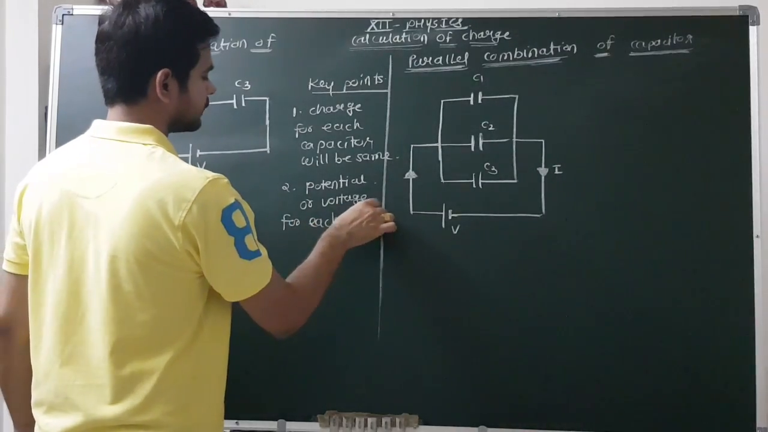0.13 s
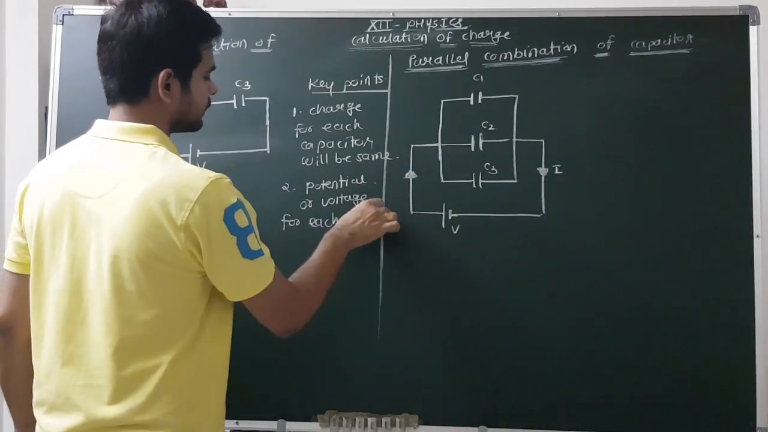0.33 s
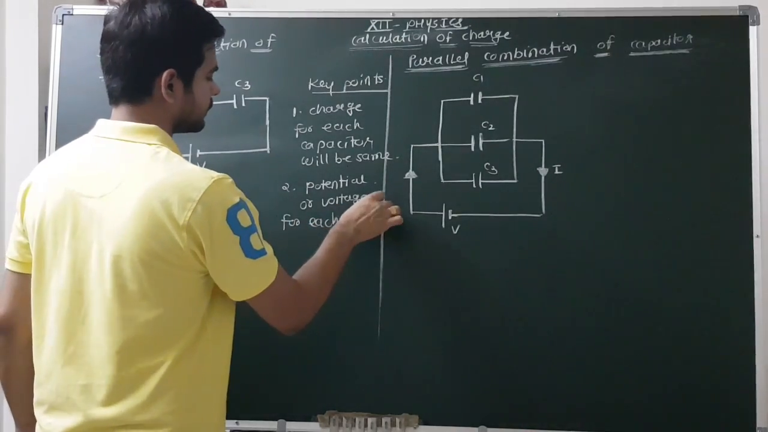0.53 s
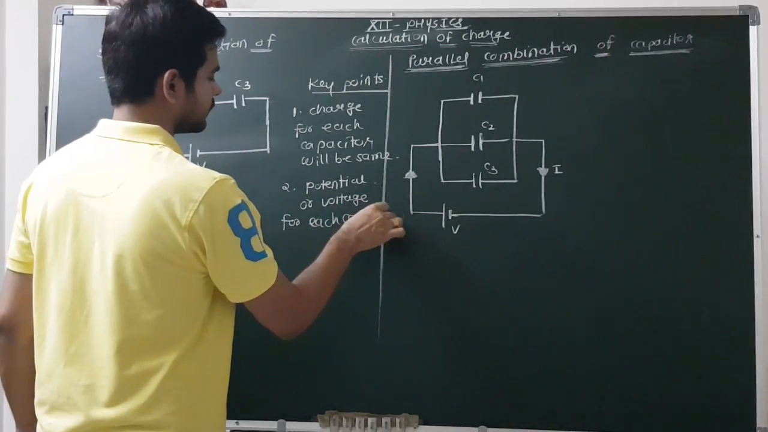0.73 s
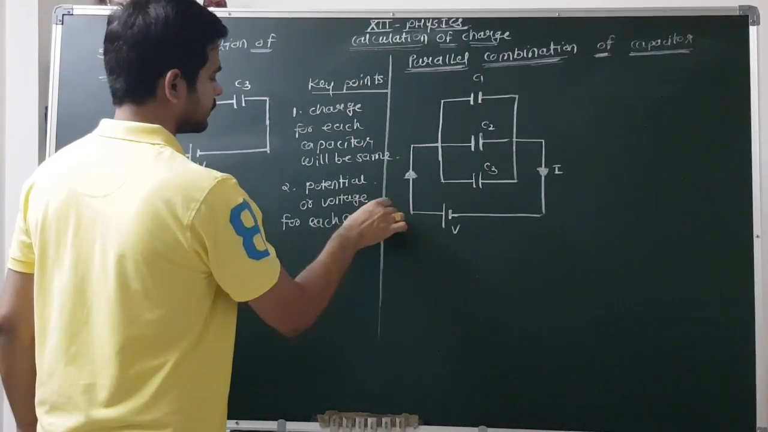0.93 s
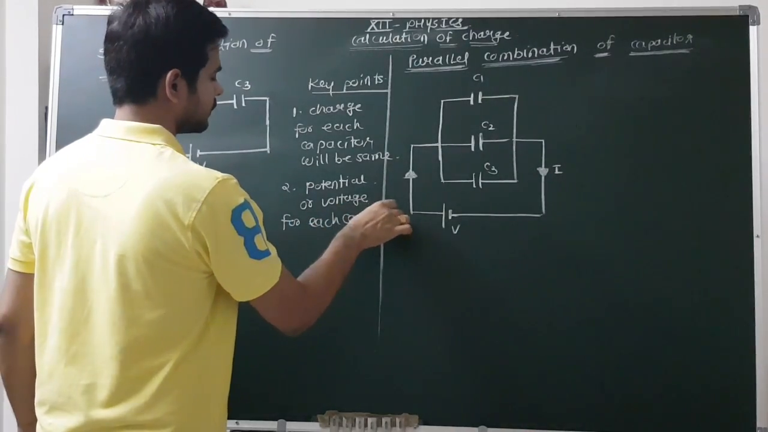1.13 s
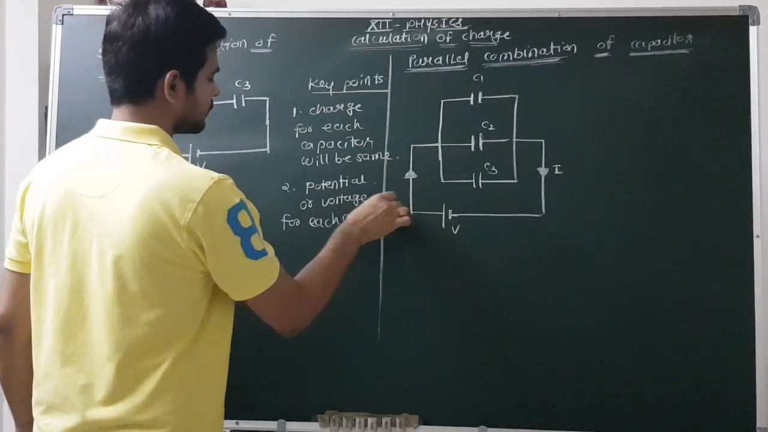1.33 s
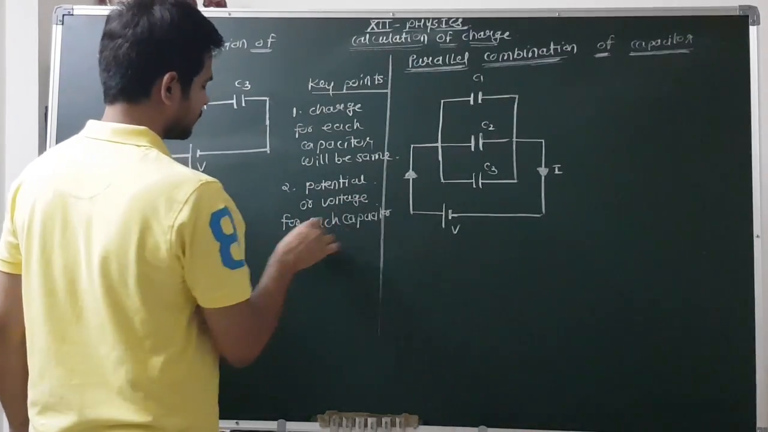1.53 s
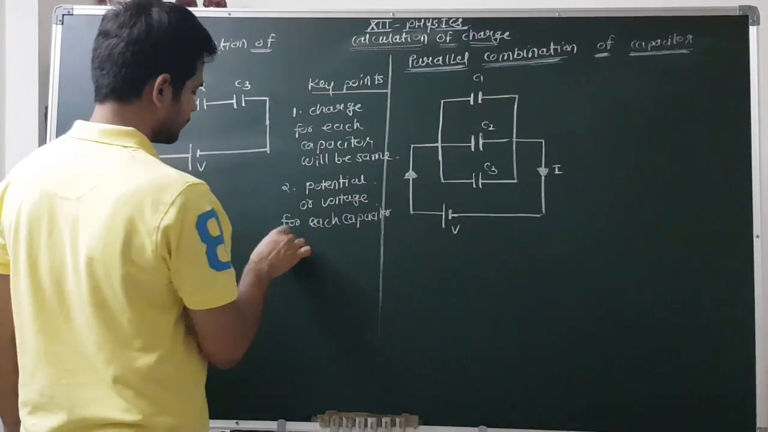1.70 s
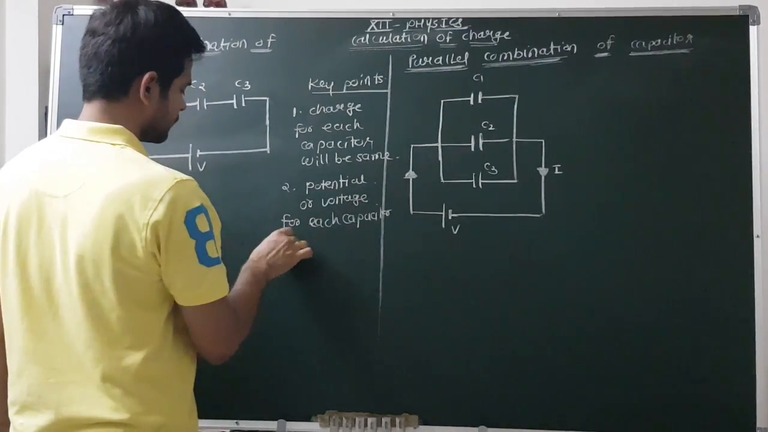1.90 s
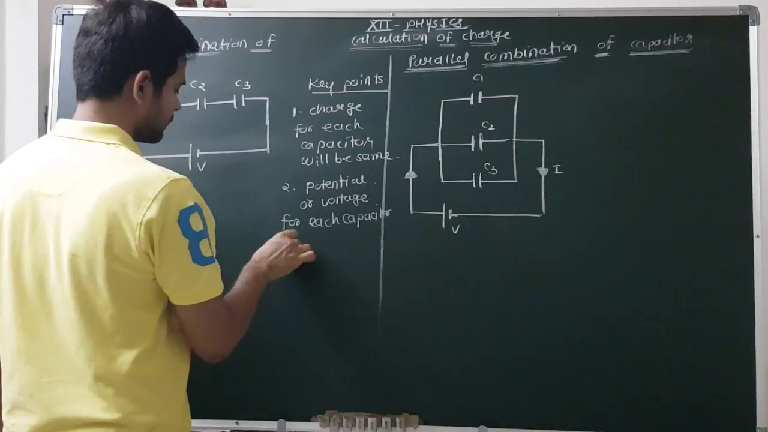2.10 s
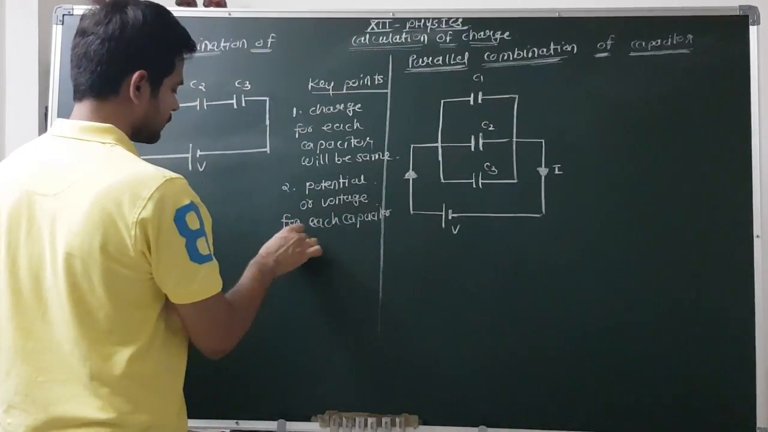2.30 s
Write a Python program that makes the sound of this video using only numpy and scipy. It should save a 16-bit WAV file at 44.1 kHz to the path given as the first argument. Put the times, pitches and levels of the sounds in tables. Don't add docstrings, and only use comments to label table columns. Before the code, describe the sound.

Chalk scratches a wall-hung blackboard in quick short strokes, with soft knocks as it lands; after a half-second pause of low room hum it taps and writes again, in a bare, slightly echoing room.

```python
import sys
import numpy as np
from scipy import signal
from scipy.fft import rfft, irfft
from scipy.io import wavfile
from scipy.ndimage import uniform_filter1d

SR = 44100
rng = np.random.default_rng(int(sys.argv[2]) if len(sys.argv) > 2 else 0)


def unload_audio(sound):
    columns = np.transpose(np.atleast_2d(sound))
    steps = np.round(np.clip(columns, -1, 1) * 32767)
    wavfile.write(sys.argv[1], SR, steps.astype(np.int16))


def gain_from_db(level_db):
    decades = np.asarray(level_db, float) / 20
    return 10 ** decades


N = 103767

# start in seconds, length in seconds, stick hiss in dB,
# lower stick modes over hiss in dB, board scrape in dB.
STROKES = [(-.03, .12, -45, -4.5, -49.5), (0.14, 0.23, -47, -4, -51.5), (0.396, 0.091, -41, -3, -47.5),
           (0.611, 0.047, -51, -0.5, -60), (0.647, 0.2, -47, -2.5, -52.5), (0.84, 0.14, -48.5, -3, -52.5),
           (0.956, 0.12, -50, -0.5, -56), (1.04, 0.15, -47.5, -2.5, -47), (1.152, 0.11, -47, -1, -50.5),
           (1.233, 0.15, -51, 0, -52.5), (1.293, 0.095, -44.5, -2, -44), (1.885, 0.074, -41, -4, -51),
           (1.913, 0.18, -44.5, -7.5, -46.5), (2.072, 0.1, -46, -7, -53.5), (2.115, 0.18, -49, -6.5, -52),
           (2.198, 0.12, -46.5, -5, -46.5), (2.264, 0.087, -71, 6, -52)]
# frequency in Hz, width in Hz, level in dB.
STICK_LOW_MODES = [(4995, 720, -0.5), (5460, 170, 3), (5765, 250, 2)]
STICK_HIGH_MODES = [(6450, 880, -7.5), (6993, 337, 0.5), (6985, 423, 0.5), (7680, 830, 3.5),
                    (7685, 920, 0.5), (8520, 1910, -2)]
# frequency in Hz, level in dB, t60 in seconds.
BOARD_MODES = [(48.6, 7, 0.18), (74, -9.5, 0.16), (142.2, -4, 0.28), (216, -10, 0.3), (271.6, 9, 0.14),
               (500, -88, .08), (752, -11, 0.3), (894, -11.5, 0.027), (960, -36, 0.088), (1400, -96, 0.033),
               (1590, -2, 0.21), (1900, -103, .06), (2520, -104, 0.058)]
# frequency in Hz, density in dB per Hz.
SCRAPE_SPECTRUM = [(60, -11), (300, -6.5), (700, 4), (1500, 3.5), (2800, 1.5), (3800, -2.5), (4600, -6),
                   (9000, -74.5)]
# frequency in Hz, width in Hz, level in dB.
BOOM_MODES = [(135, 14, 0), (270, 22, -3)]
# time in seconds, peak in dB, contact in ms.
LANDINGS = [
    (.1640, -15, .85),
    (.3790, -24.5, 1.0),
    (.6119, -14.5, 1.15),
    (.8612, -23, 1.0),
    (1.8836, -15.5, .95),
]
# wash top in Hz, wash in dB, tick in dB, thump in dB.
LANDING_COLOURS = [(3060, -21.5, -12.5, -5.5), (1640, -26.5, -12, -12), (1550, -25.5, -18, -5.5),
                   (1670, -22.5, -18, 1), (2870, -24, -27, -2)]
TICK_MOST_DB = [-16, -34, -18, -24, -34]
# frequency in Hz, width in Hz, level in dB.
TICK_MODES = [(4820, 460, 5), (6340, 2100, 6), (7970, 910, 6.5)]
# time in seconds, level in dB, share above the deep band in dB.
HAND_RUB = [(0, -55.5, 0), (.2, -51.5, 1.5), (.45, -51, 3), (.56, -56.5, -1.5), (.65, -54, 1),
            (.95, -52, -2), (1.05, -55.5, 2.5), (1.12, -48.5, 3.5), (1.2, -47, -2.5), (1.27, -48.5, -1),
            (1.362, -52.5, -1.5), (1.8, -61, 3), (1.95, -62.5, 13), (2.1, -61.5, 3), (2.35, -57.5, -2.5)]
# frequency in Hz, density in dB per Hz.
AIR_SPECTRUM = [(35, 5), (270, 3), (400, -18), (750, -10.5), (1350, -20), (1900, -27), (3800, -27),
                (6000, -19.5)]
# from in Hz, to in Hz, t60 in seconds.
ROOM_BANDS = [(122, 312, 0.49), (367, 1295, 0.65), (1620, 4700, 0.55), (3240, 4700, 0.52),
              (6500, 16700, 0.41)]

RISE_SHARE, FALL_SHARE = 0.47, 0.46
GRAINS_PER_S, GRAIN_SPREAD_DB, JUDDER_DB, JUDDER_PER_S = 14000, 1.5, 1.2, 90
GRIP_SHIFT, GRIP_DB, GRIP_DAMPING_HZ = 0.025, 1.5, 420
SCRAPE_RING_DB, KNOCK_RING_DB, BOOM_DB, HUM_DB = -10.5, -14.5, -10, -1
KNOCK_SAG_HZ, THUMP_HZ, THUMP_T60_S, THUMP_LAG_S = 110, 60, 0.032, 0.0014
WASH_T60_S, WASH_LOW_HZ, WASH_RISE_S = 0.37, 587, 0.004
HAND_LOW_HZ, HAND_MID_HZ, HAND_TOP_HZ = 31, 93, 273
AIR_DB, AIR_TOP_DB = -54, -33
FAN_HZ, FAN_WIDTH_HZ, FAN_DB = 1350, 150, -75
ROOM_DB, FIRST_WALL_S = -4, 0.0079
SIDE_DB, SIDE_LOW_HZ = -28.5, 900
MIC_TOP_HZ, MIC_LOW_HZ = 9900, 33
TOP_FROM_HZ, TOP_STEP_HZ, TOP_SENSE_S, TOP_LOSS_DB = 9900, 420, 0.023, -50
TOP_UNDER_DB, TOP_FLICKER_DB, TOP_STRICTER_DB = -33.5, 2.5, 0.5


def scrape():
    _, _, hiss_db, low_db, board_db = np.transpose(STROKES)
    force, shake = grains(), grains()
    hiss = gripped(force, STICK_HIGH_MODES, hiss_db)
    hiss = hiss + gripped(force, STICK_LOW_MODES, hiss_db + low_db)
    rumble = gain_from_db(SCRAPE_RING_DB) * rms_one(board(shake))
    rumble = rumble + gain_from_db(BOOM_DB) * rms_one(stick(shake, BOOM_MODES))
    return hiss + pressure(board_db) * (colour(shake, SCRAPE_SPECTRUM) + rumble)


def grains():
    sizes = gain_from_db(GRAIN_SPREAD_DB * np.minimum(rng.exponential(1, N), 5))
    signs = rng.choice([-1, 1], N)
    breaks = rng.random(N) < GRAINS_PER_S / SR
    return sizes * signs * breaks * gain_from_db(JUDDER_DB * drift(JUDDER_PER_S))


def gripped(force, modes, levels_db):
    out = np.zeros(N)
    chance = rng.standard_normal((len(STROKES), len(modes) + 1))
    for k, (start, length, *_) in enumerate(STROKES):
        part = slice(max(int(start * SR), 0), int((start + length) * SR) + 400)
        shift = 1 + GRIP_SHIFT * chance[k, -1]
        moved = [(hz * shift, max(width, GRIP_DAMPING_HZ), db + GRIP_DB * c)
                 for (hz, width, db), c in zip(modes, chance[k])]
        alone_db = np.where(np.arange(len(STROKES)) == k, levels_db, -200)
        out[part] += pressure(alone_db)[part] * rms_one(stick(force[part], moved))
    return out


def pressure(levels_db):
    t = np.arange(0, N + 64, 32) / SR
    power = 0
    for (start, length, *_), db in zip(STROKES, levels_db):
        u = (t - start) / length
        ramp = np.clip(np.minimum(u / RISE_SHARE, (1 - u) / FALL_SHARE), 0, 1)
        power += (gain_from_db(db) * np.sin(np.pi / 2 * ramp) ** 2) ** 2
    return np.interp(np.arange(N) / SR, t, np.sqrt(power))


def stick(force, modes):
    out = 0
    for k, (hz, width_hz, db) in enumerate(modes):
        t60_s = np.log(1000) / np.pi / width_hz
        out = out + (-1) ** k * gain_from_db(db) * np.sqrt(width_hz) * ring(force, hz, t60_s)
    return out


def board(force):
    return sum(gain_from_db(db) * ring(force, hz, max(t60_s, 0.01)) for hz, db, t60_s in BOARD_MODES)


def taps():
    push, tick, thump, wash = np.zeros((4, N))
    t, noise = np.arange(N) / SR, rng.standard_normal(N)
    for landing, tint, most_db in zip(LANDINGS, LANDING_COLOURS, TICK_MOST_DB):
        start_s, db, contact_ms = landing
        top_hz, wash_db, tick_db, thump_db = tint
        since = t - start_s
        push += gain_from_db(db) * np.sin(np.pi * np.clip(since * 1000 / contact_ms, 0, 1)) ** 2
        tick[int(start_s * SR) + 8] = gain_from_db(db + min(tick_db, most_db) - 30)
        thump[int((start_s + THUMP_LAG_S) * SR)] = -gain_from_db(db + thump_db)
        decay = gain_from_db(wash_db + db - 60 * np.maximum(since, 0) / WASH_T60_S)
        waves = cut(cut(noise, WASH_LOW_HZ, "high"), top_hz, "low", order=6)
        wash += np.clip(since / WASH_RISE_S, 0, 1) * decay * rms_one(waves)
    ringing = board(push) + stick(push, BOOM_MODES) / 5
    knock = cut(push, KNOCK_SAG_HZ, "high", order=1) + gain_from_db(KNOCK_RING_DB - 36) * ringing
    return knock + ring(thump, THUMP_HZ, THUMP_T60_S) + stick(tick, TICK_MODES) + wash


def hand():
    s, db, share_db = np.transpose(HAND_RUB)
    t = np.arange(N) / SR
    level, share = gain_from_db(np.interp(t, s, db)), gain_from_db(np.interp(t, s, share_db))
    deep = rub([HAND_LOW_HZ, HAND_MID_HZ])
    high = rub([HAND_MID_HZ, HAND_TOP_HZ])
    high = high + gain_from_db(HUM_DB) * rms_one(stick(rng.standard_normal(N), BOOM_MODES))
    return level * (deep / share + high * share)


def rub(band_hz):
    return rms_one(cut(rng.standard_normal(N), band_hz, "band")) * gain_from_db(1.6 * drift(8.6))


def classroom(x):
    t = np.arange(SR) / SR
    onset = np.clip(t / FIRST_WALL_S - 1, 0, 1)
    tail = np.zeros(SR)
    for low_hz, high_hz, t60_s in ROOM_BANDS:
        band = cut(rng.standard_normal(SR), [low_hz, high_hz], "band")
        tail += rms_one(band * onset * gain_from_db(-60 * t / t60_s)) * np.sqrt((high_hz - low_hz) / SR)
    return signal.fftconvolve(x, tail / np.sqrt(SR / 2))[:N]


def air():
    spectrum = AIR_SPECTRUM + [(14500, AIR_TOP_DB)]
    return gain_from_db(AIR_DB + 0.5 * drift(1.33)) * colour(rng.standard_normal(N), spectrum)


def fan():
    return gain_from_db(FAN_DB) * rms_one(stick(rng.standard_normal(N), [(FAN_HZ, FAN_WIDTH_HZ, 0)]))


def ring(x, hz, t60_s):
    r, w = gain_from_db(-60 / (t60_s * SR)), 2 * np.pi * hz / SR
    return signal.lfilter([0, np.sin(w)], [1, -2 * r * np.cos(w), r * r], x + 1e-18)


def drift(rate_hz):
    r = np.exp(-2 * np.pi * rate_hz / SR)
    return rms_one(signal.lfilter([1], [1, -2 * r, r * r], rng.standard_normal(N + SR))[SR:])


def colour(x, spectrum):
    gain = gain_from_db(at_hz(spectrum, np.fft.rfftfreq(N, 1 / SR)))
    return rms_one(irfft(rfft(x) * gain, N))


def at_hz(points, hz):
    point_hz, value = np.array(points).T
    return np.interp(np.log(hz + 1), np.log(point_hz), value)


def cut(x, hz, kind, order=2):
    sos = signal.butter(order, np.clip(hz, 10, 0.45 * SR), kind, fs=SR, output="sos")
    return signal.sosfilt(sos, x)


def rms_one(x):
    return x / np.sqrt(np.mean(x ** 2) + 1e-20)


def scene():
    chalk = scrape() + taps()
    heard = chalk + gain_from_db(ROOM_DB) * classroom(chalk)
    mid = cut(heard, MIC_TOP_HZ, "low", order=4) + hand() + air() + fan()
    side = gain_from_db(SIDE_DB) * cut(np.roll(mid, 300), SIDE_LOW_HZ, "high", order=1)
    return np.array([mid + side, mid - side])


def level_db(x):
    return 10 * np.log10(uniform_filter1d(x ** 2, int(TOP_SENSE_S * SR)) + 1e-14)


def shut_top(x):
    spectrum, hz = rfft(x), np.fft.rfftfreq(N, 1 / SR)
    whole_db = level_db(cut(x[0], 670, "high"))
    for low_hz in TOP_FROM_HZ + TOP_STEP_HZ * np.arange(12):
        band = irfft(spectrum * ((hz > low_hz) & (hz <= low_hz + TOP_STEP_HZ)), N)
        steps = min(low_hz - TOP_FROM_HZ, 2200) / TOP_STEP_HZ
        limit_db = whole_db + TOP_UNDER_DB + TOP_STRICTER_DB * steps
        shut = level_db(band[0]) + TOP_FLICKER_DB * drift(15) < limit_db
        x = x - band * (1 - gain_from_db(TOP_LOSS_DB)) * uniform_filter1d(1.0 * shut, 500)
    return x


def roll_off(x):
    return signal.sosfilt(signal.butter(12, 14620, fs=SR, output="sos"), x)


def record(dry):
    mix = shut_top(cut(dry, MIC_LOW_HZ, "high"))
    return roll_off(mix)


dry = scene()
out = record(dry)
unload_audio(out)
```